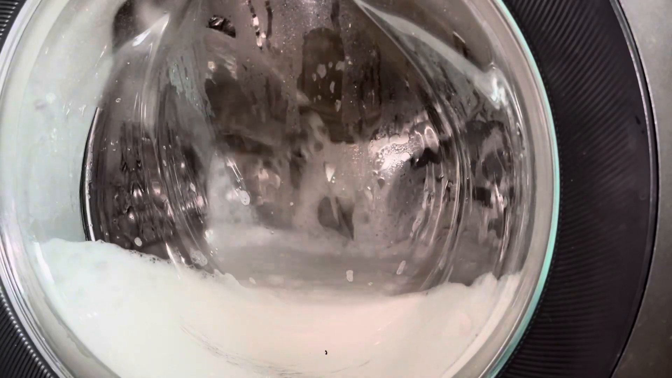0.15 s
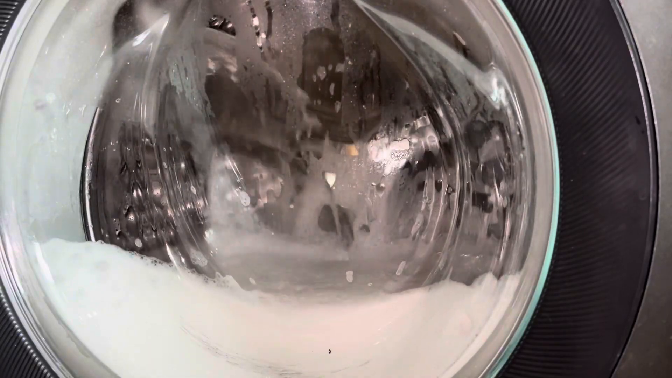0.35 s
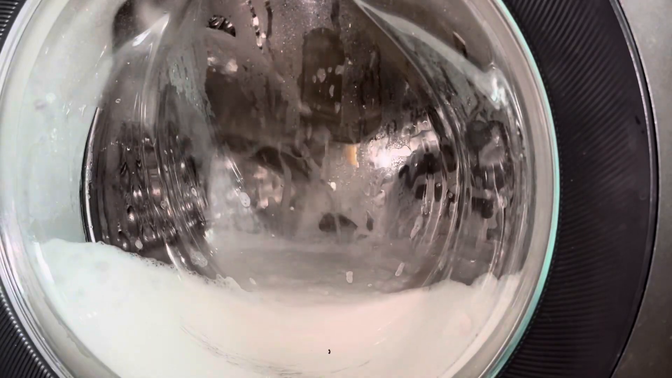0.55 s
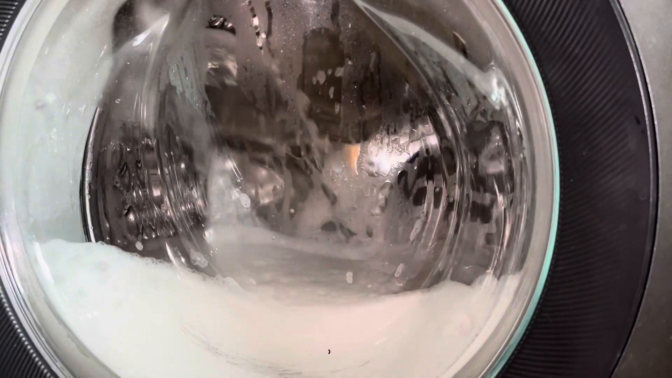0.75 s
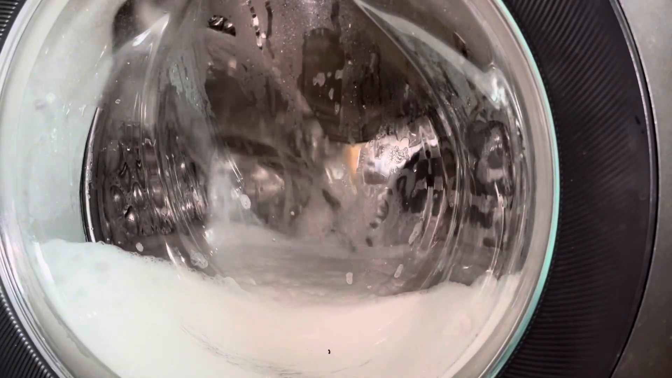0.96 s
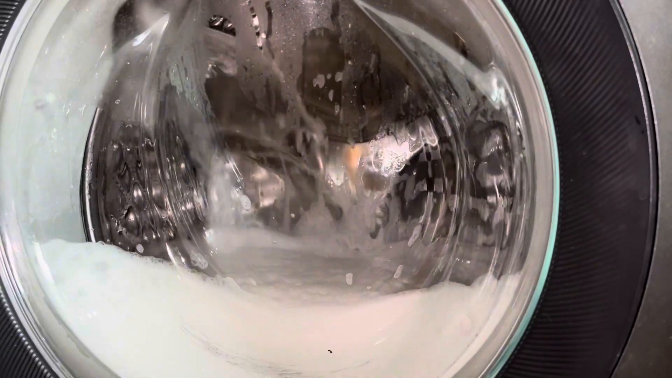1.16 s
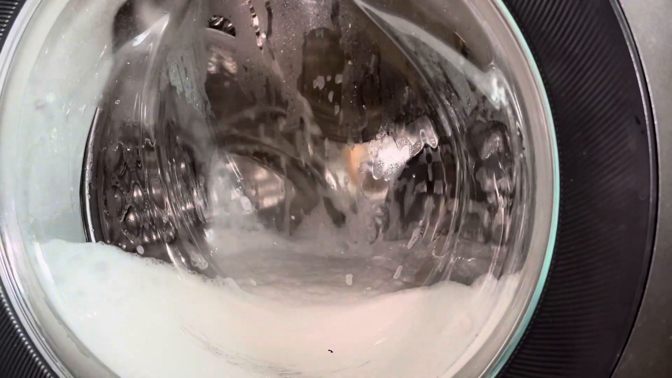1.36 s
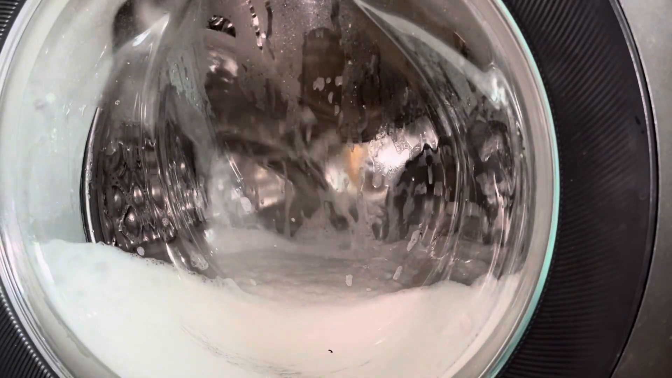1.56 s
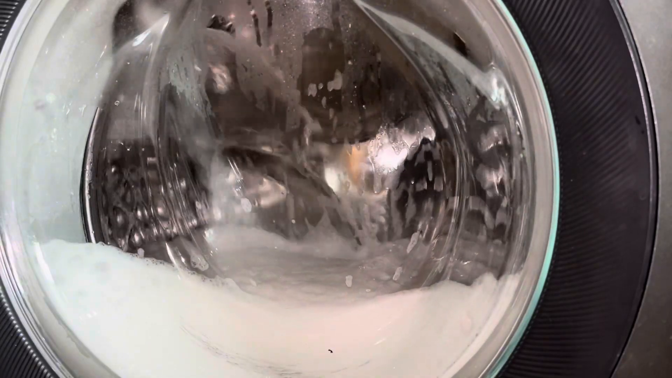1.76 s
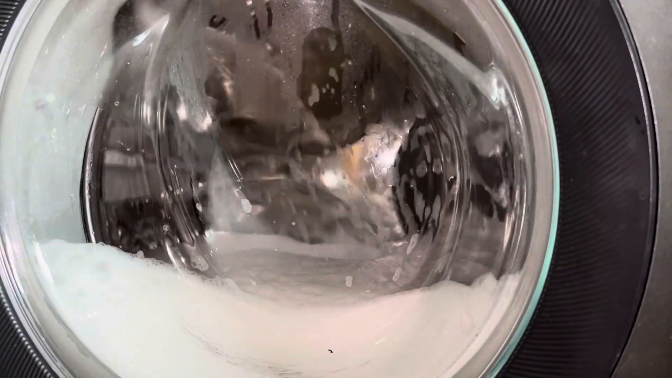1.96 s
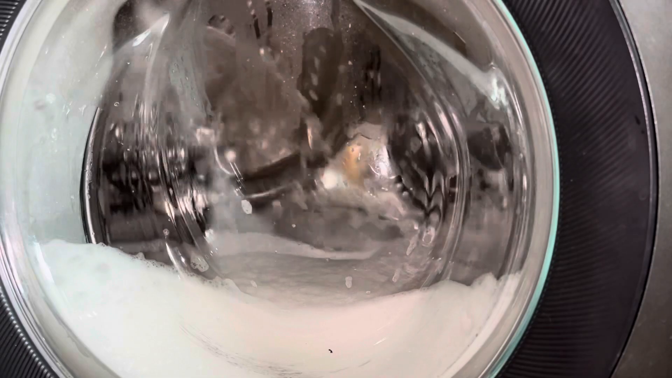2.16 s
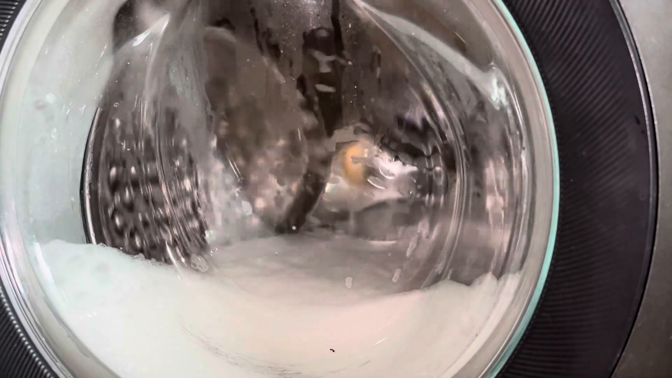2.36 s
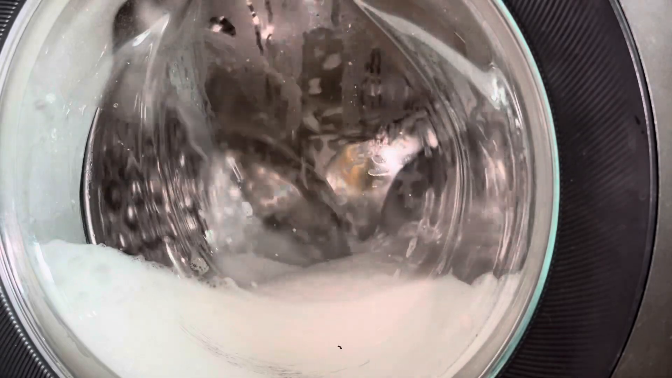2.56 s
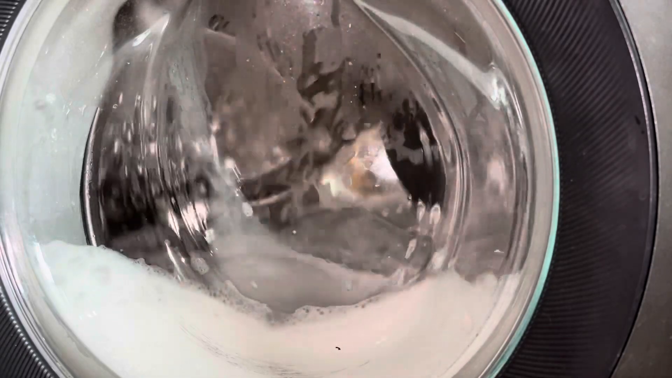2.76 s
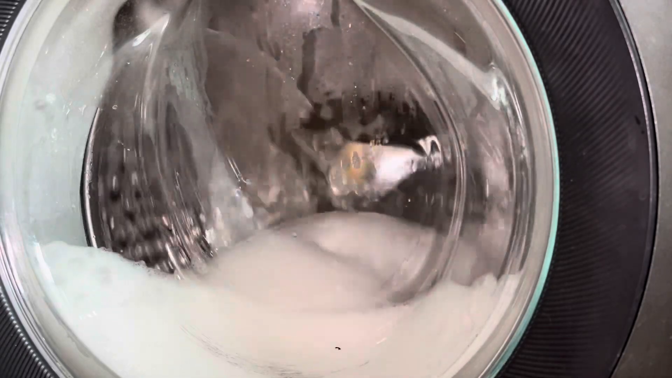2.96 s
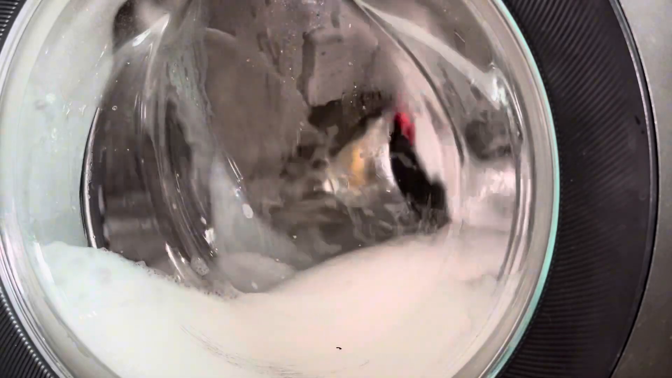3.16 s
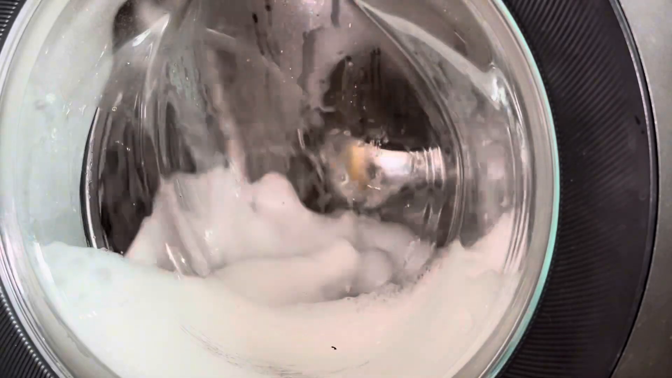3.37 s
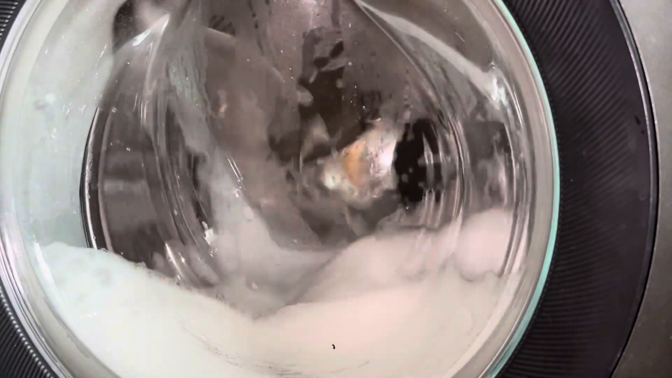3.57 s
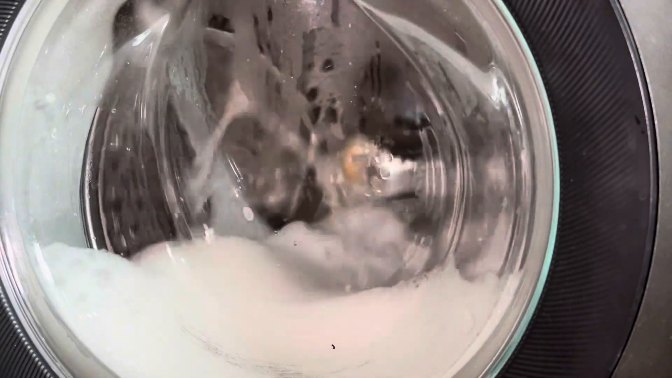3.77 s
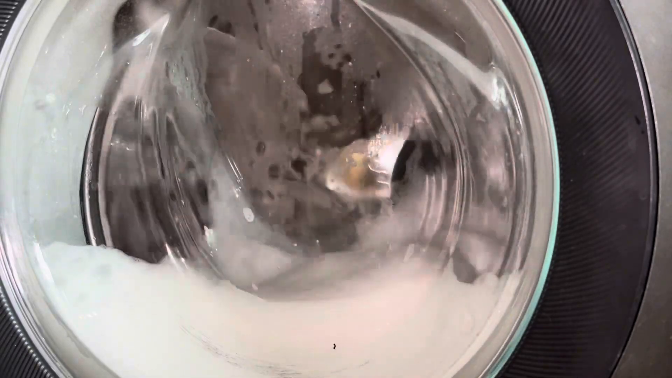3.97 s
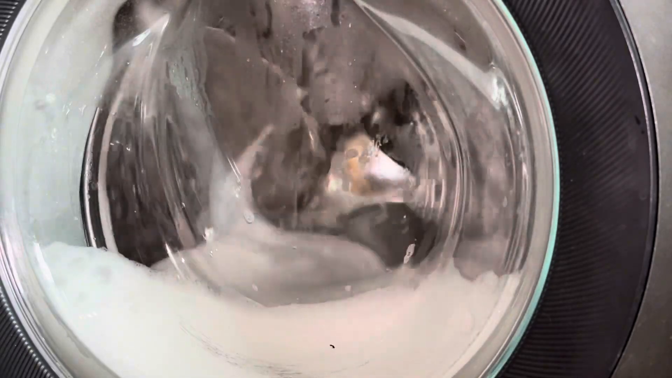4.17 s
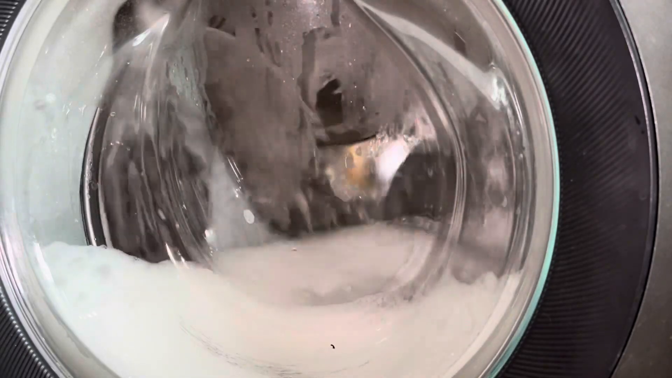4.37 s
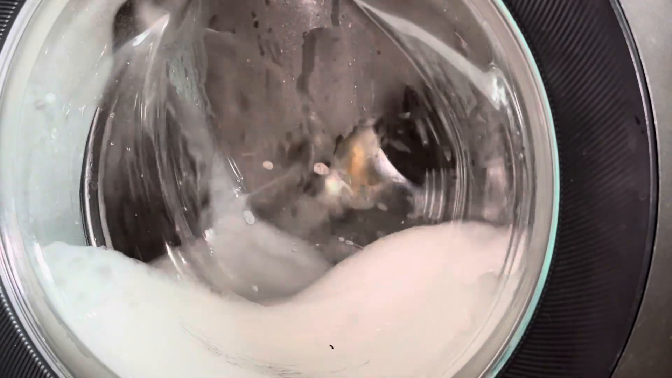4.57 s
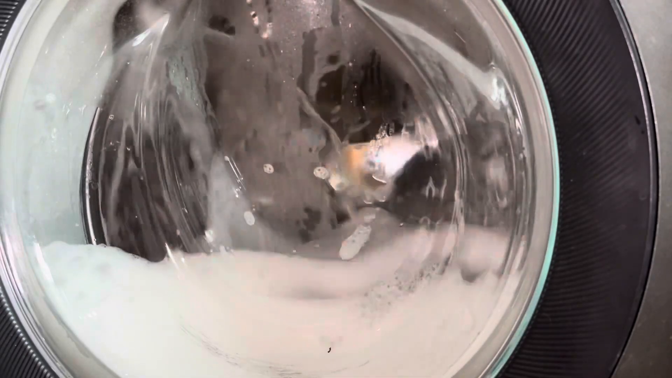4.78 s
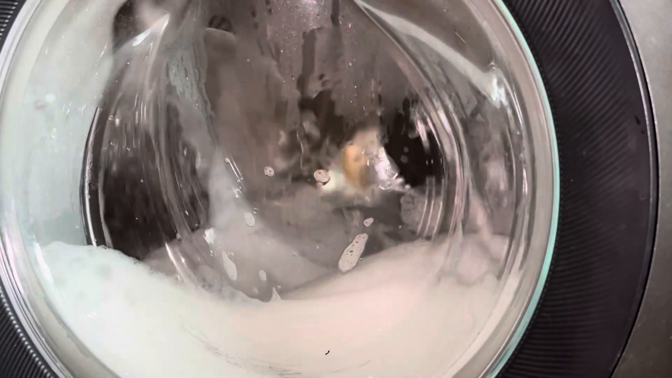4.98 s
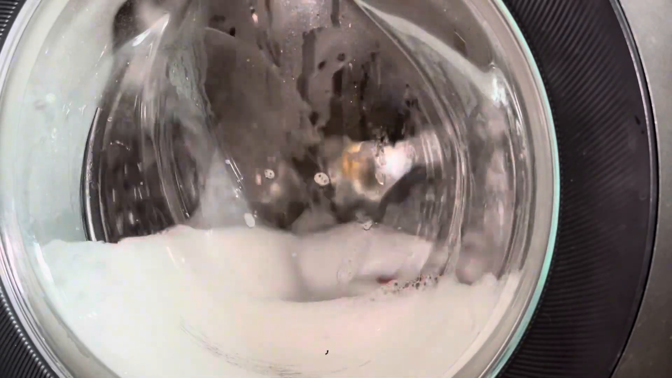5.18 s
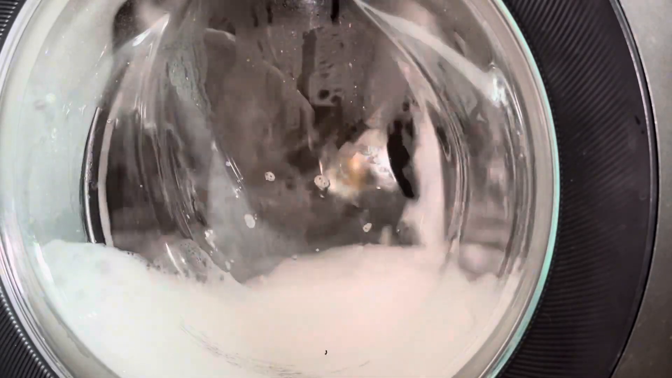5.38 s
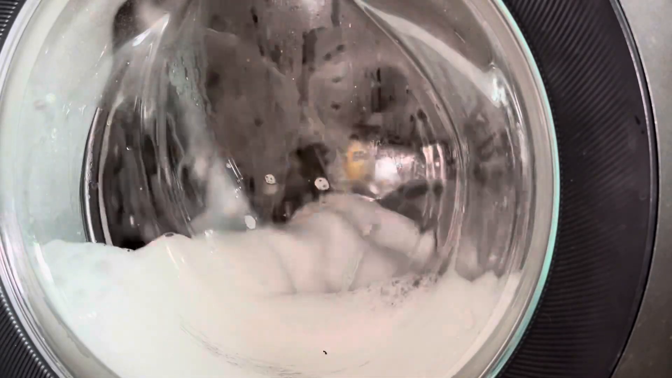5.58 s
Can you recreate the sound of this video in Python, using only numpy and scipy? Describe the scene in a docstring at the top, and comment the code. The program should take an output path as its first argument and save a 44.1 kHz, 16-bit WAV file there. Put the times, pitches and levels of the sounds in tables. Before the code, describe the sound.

Stereo close microphone, indoors, near the glass door. The pump hums under quiet trickling and a faint hiss while the drum rests. Then light ticks become clustered hard clacks and dull thuds of a solid object falling about the steel drum, the heaviest near five seconds, with suds swishing, rubbing and low panel thumps.

```python
"""A pump hums and water trickles behind washing-machine door glass; then the drum turns. A hard slab tumbles in
it: shaped noise bursts with a sharp first touch ring steel and glass modes. Slow sine swells boom the cabinet
and thud under the slab; coloured noise sloshes and rustles through the drum modes. Tones make the hum, noise
and ticks the water; below lie rumble, top hiss and a thin whistle."""
import sys
import numpy as np
from scipy import signal
from scipy.fft import rfft, irfft, next_fast_len
from scipy.io import wavfile
from scipy.ndimage import uniform_filter1d

SR = 44100
rng = np.random.default_rng(int(sys.argv[2]) if len(sys.argv) > 2 else 0)


def digitize_waveform(pressure):
    """Quantize a signal to 16-bit integers and store it at the path in sys.argv[1].

    Rows of a 2-D input are taken as channels; values are limited to [-1, 1].
    """
    field = np.atleast_2d(pressure).T
    bounded = np.clip(field, -1, 1)
    quanta = np.round(bounded * 32767).astype(np.int16)
    wavfile.write(sys.argv[1], SR, quanta)


N = 248283

# slab on drum: t/s, level/dB, contact centre f/Hz, struck spot's note f/Hz,
# then relative level/dB of thud, clank, note, crack, first touch; fade t60/s
SLAB_KNOCKS = [(2.015, -36, 337, 926, -5, -14, -10, -38, -9, 0.14),
               (2.134, -47.5, 430, 1450, -10, -15, -20, -48, -5, 0.25),
               (2.19, -43, 284, 810, -25, -6.5, -8, -39, -3, 0.16),
               (2.275, -37.5, 313, 830, 1, -9, -5.5, -36, -5, 0.14),
               (2.416, -36, 346, 1040, -5, -8, -14, -36, -1, 0.091),
               (2.467, -30, 338, 1490, -12, -9.5, -18, -35.5, -11, 0.13),
               (2.491, -40, 410, 810, -10, -11, -16, -36, 5, 0.076),
               (2.53, -25.5, 580, 750, -12, -9.5, -22, -44, 8.5, 0.133),
               (2.543, -24, 434, 890, -18, -11, -24, -39, 1, 0.11),
               (2.556, -39.5, 363, 825, -17, -5.5, -20, -35, 3, 0.11),
               (2.589, -31.5, 500, 800, -24, -14, -23, -45, 4, 0.087),
               (2.65, -32.5, 510, 1500, -18, -12, -16, -40, 6, 0.14),
               (2.701, -28, 365, 950, -15, -16, -26, -51, -7, 0.041),
               (2.713, -31, 326, 1020, -31, -10.5, -11, -40, -1.5, 0.14),
               (2.781, -54, 318, 1980, -10, 4.5, -5, -22, -5, 0.18),
               (2.947, -42.5, 267, 980, -8.5, -14.5, -8.5, -43, 2, 0.19),
               (2.982, -50.5, 400, 990, -14, -10, -17, -26, -4, 0.11),
               (3.089, -27, 430, 940, -6.5, -6, -5.5, -31.5, -6, 0.089),
               (3.158, -36, 273, 1940, -27, -6, -20, -32, -4, 0.13),
               (3.236, -25, 515, 930, -2.5, -9.5, -11, -32, 2, 0.14),
               (3.359, -18.5, 377, 1930, -16.5, -15.5, -41, -40, 2, 0.1),
               (3.376, -20, 331, 834, 2.5, -14.5, -12, -37.5, 2.5, 0.12),
               (3.396, -29, 300, 857, -11, -8.5, -10, -36, -2, 0.096),
               (3.427, -27, 242, 986, -14, -19.5, -21, -50, -2, 0.091),
               (3.496, -47, 383, 1040, -15.5, -22, -23, -57, 4, 0.23),
               (3.538, -37, 390, 2000, -10, -9.5, -18, -36.5, -6, 0.13),
               (3.608, -34.5, 308, 1960, 4, -9.5, -20, -32, -3.5, 0.07),
               (3.716, -22, 408, 710, -25, -17.5, -25.5, -43, 6.5, 0.17),
               (3.733, -24.5, 256, 820, -19, -39, -42, -47, -1.5, 0.026),
               (3.803, -16, 618, 1390, -6.5, -9, -11.5, -36, 2.5, 0.115),
               (3.852, -32, 470, 916, -5.5, -5.5, -19, -32.5, -5, 0.15),
               (3.897, -44, 400, 2450, -6, -7.5, -4, -23, -6.5, 0.072),
               (3.93, -24.5, 487, 1370, -4.5, -3.5, -19, -32, 3.5, 0.12),
               (4.004, -35, 860, 2360, -34, 0, -17, -25, -2, 0.12),
               (4.039, -39.5, 267, 1116, 7.5, 1, -3.5, -37, 7.5, 0.14),
               (4.07, -37.5, 310, 1040, -8, -23, -23, -46, 1, 0.23),
               (4.105, -41, 620, 850, -7, -15, -14, -45, 4, 0.09),
               (4.137, -48, 493, 2260, -7, -4.5, -12, -31, 1, 0.1),
               (4.213, -17.5, 663, 1496, -7.5, -10, -11.5, -34, -1, 0.1195),
               (4.258, -32, 555, 810, -18, -12, -18, -38, 8, 0.2),
               (4.334, -33, 558, 880, -9, -9.5, -8.5, -50, 12, 0.158),
               (4.408, -39.5, 448, 1000, -2, -9, -15, -35, -2, 0.15),
               (4.5298, -20, 440, 1300, -16.5, -3.5, -15, -23, 3.5, 0.048),
               (4.55, -40, 318, 1750, 2, -5, -13, -29, -3, 0.26),
               (4.706, -39.5, 440, 1880, -14, -0.5, -18, -23, 5, 0.15),
               (4.804, -17.5, 500, 1530, -14.5, -16, -21.5, -41, -7.5, 0.067),
               (4.815, -22, 503, 1590, -9, -27, -18, -40, 2, 0.097),
               (4.826, -29.5, 522, 802, -7, -20, -21, -45, -6, 0.1),
               (4.841, -18, 350, 800, 1, -22, -28, -53, -8, 0.094),
               (4.866, -39, 259, 750, 3, -17, -25, -51, 2, 0.062),
               (4.897, -36, 390, 960, -6, -20, -22, -45, -1, 0.097),
               (4.928, -30, 497, 775, -6, -20, -26, -40, -3, 0.1),
               (5.012, -44, 410, 970, -3, -14.5, -8, -40, -4, 0.31),
               (5.077, -28, 509, 975, -18, -4.5, -16, -40, 5.5, 0.083),
               (5.081, -9, 342, 1020, -9, -22.5, -35, -45, -1.5, 0.077),
               (5.093, -20.5, 256, 1400, -15.5, -20, -29, -43.5, -2.5, 0.13),
               (5.139, -35.5, 480, 950, -11, -22, -28, -33, 11, 0.13),
               (5.19, -36.5, 410, 905, -1, -23, -26, -34, -1, 0.088),
               (5.302, -50.5, 450, 1510, -12, -5, -10, -34, -2, 0.084),
               (5.333, -34.5, 294, 850, 8, -13, -14.5, -32, -0.5, 0.11),
               (5.45, -32.5, 331, 790, -6.5, -14.5, -24, -49, 12, 0.18),
               (5.5, -44, 460, 1990, -8, -2, -19, -40, -1, 0.15),
               (5.535, -23, 470, 1940, -19, -11, -25.5, -37, 8.5, 0.13),
               (5.562, -35, 460, 1480, 17, -9, -23, -32, 6, 0.13),
               (5.583, -28, 493, 740, -24, -12, -28, -41, 3, 0.13)]
# cabinet booms, with a few higher slab thuds near 125-130 Hz among them: t/s, level/dB, f/Hz
CABINET_BOOMS = [(2.063, -44, 73.5), (2.36, -49, 91), (2.561, -55, 130), (3.021, -34.5, 73.4),
                 (3.124, -59, 63.4), (3.263, -42, 73), (3.39, -38, 58.3), (3.439, -32.5, 73.4),
                 (3.633, -42, 69), (3.823, -31, 59.8), (3.853, -39, 56.7), (3.944, -30.5, 70.8),
                 (4.071, -39, 63.7), (4.22, -34, 69), (4.432, -39.5, 62.6), (4.539, -31, 125),
                 (4.69, -39.5, 75.7), (4.832, -39, 69), (4.864, -41, 54.3), (5.195, -50, 99),
                 (5.342, -33, 69), (5.408, -42, 75.6), (5.533, -36, 66.6)]
# drum and tub modes: f/Hz, width/Hz, relative level/dB
DRUM_MODES = [(172, 25, -2), (198, 20, -1), (248, 25, 2), (300, 20, 0), (345, 25, -4), (412, 22, -1),
              (467, 15, 4), (581, 25, -2), (664, 22, 2), (725, 25, -2), (824, 16, 3), (895, 16, 1),
              (965, 35, -1), (1035, 22, -2), (1180, 90, -3), (1300, 50, -1), (1372, 40, 1), (1484, 30, 0),
              (1550, 30, 3), (1840, 45, 0), (2060, 80, -6), (2395, 60, 4), (2980, 90, -1), (2420, 260, 1),
              (4400, 700, 1)]
# door glass modes: f/Hz, width/Hz, relative level/dB
GLASS_MODES = [(2284, 8, -13.5), (2830, 10, -12), (3730, 280, 8), (4220, 41, 2), (4650, 84, -4.5),
               (5230, 58, -16)]
# cabinet resonances in the rumble: f/Hz, width/Hz, relative level/dB
CABINET_MODES = [(69, 18, 9), (144, 1.9, -11.5), (293, 24, 10), (331, 3.1, -10.5), (498, 60, 3.5),
                 (637, 89, 3), (805, 26, 5.5), (937, 13, 7)]
# suds and load sliding round the drum, ahead of its modes: t/s, level/dB
SLOSH_LEVEL = [(1.9, -69), (2.22, -53), (2.6, -47), (2.85, -51), (3.7, -52.5), (3.92, -34), (4.08, -49),
               (5.43, -47), (5.63, -41)]
# slosh colour: f/Hz, relative level/dB
SLOSH_SPECTRUM = [(30, -1.5), (65, 12), (150, -9), (400, -0.5), (800, -9), (1600, -25.5), (3000, -44),
                  (8000, -64)]
# suds and slab rubbing on steel, ahead of its modes: t/s, level/dB
RUSTLE_LEVEL = [(1.95, -70), (2.53, -65), (2.62, -60.5), (2.93, -67), (3.33, -62), (3.63, -62.5),
                (3.77, -60.5), (3.91, -53), (4.02, -55.5), (4.22, -72), (4.34, -54), (4.43, -74.5),
                (4.58, -62), (4.76, -60.5), (5.43, -66.5), (5.63, -52)]
# rustle colour: f/Hz, relative level/dB
RUSTLE_SPECTRUM = [(400, -14.5), (800, 8.5), (1500, 1), (2450, -20.5), (2800, -23), (4500, -37.5),
                   (6000, -36), (8000, -57)]
# water on the glass, draining, then fed by the turning drum: t/s, level/dB
TRICKLE_LEVEL = [(0.0, -65.5), (0.25, -68), (0.72, -70.5), (1.8, -78), (2.27, -76.5), (2.7, -78),
                 (3.3, -79), (3.8, -73.5), (4.6, -70.5), (5.63, -65)]
# trickle colour: f/Hz, relative level/dB
TRICKLE_SPECTRUM = [(800, -14.5), (1500, -1.5), (2100, -0.5), (2900, -8.5), (3200, -3.5), (3600, -12),
                    (5000, -9), (6200, -12), (7400, -6.5), (7900, -37), (8800, -52)]
# clearest drops on the glass: t/s, level/dB
GLASS_DRIPS = [(0.0373, -62), (0.1261, -64), (0.158, -63), (0.178, -66), (0.4963, -64), (0.5272, -62),
               (0.6265, -61), (1.1333, -67)]
# pump tones and a faint high whine: f/Hz, level/dB, waver width/Hz
PUMP_TONES = [(100, -52, .3), (200, -57, .8), (301, -61.5, 8), (402, -69, 8), (500, -71, 10),
              (9980, -105, 12)]
# pump and water rumble colour: f/Hz, relative level/dB
RUMBLE_SPECTRUM = [(25, -33), (45, -9), (66, 0.5), (90, -12.5), (150, 6), (240, -4.5), (300, -6), (400, -2),
                   (520, -9), (820, -15.5), (1100, -16.5), (1800, -24.5), (3000, -49), (7000, -58),
                   (14000, -49)]
# faint top hiss: t/s, level/dB
FIZZ_LEVEL = [(0.0, -82), (1.5, -87.5), (3.21, -85), (4.06, -80.5), (4.94, -81.5), (5.63, -80)]
# top hiss colour: f/Hz, relative level/dB
FIZZ_SPECTRUM = [(8500, -37), (9600, 5), (10200, -4), (13500, -6), (14500, -11)]
# one thin whistle: t/s, length/s, level/dB, f/Hz
THIN_WHISTLE = (2.912, .065, -82, 6400)
# port pair likeness: f/Hz, share of common sound (0-1)
PORT_LIKENESS = [(60, 1), (130, 0.8), (290, 0.76), (630, 0.28), (1300, 0.39), (2300, .75), (4300, 1),
                 (6000, 0.2), (7800, 0.9), (10500, 0.8), (14000, 0.8)]
# port pair, left lead: f/Hz, phase/rad
PORT_LEAD = [(60, 0.49), (950, -0.32), (1550, -1.46), (1810, 0.98), (3790, 1), (4740, 1.62), (7670, -3.5),
             (9470, -2.5), (10400, -6.5), (13600, -6)]
# port pair, left over right: f/Hz, balance/dB
PORT_BALANCE = [(60, 0.5), (500, 0.5), (1200, -0.5), (2500, 4), (5000, 8.5), (8000, -0.5)]

# hardness = (usual / fade) ** power: short knocks are harder and rise faster
USUAL_T60_S, HARD_POWER, USUAL_RISE_S = 0.1297, 0.62, 0.003108
TOUCH_WEIGHT = 0.56
NOTE_BAND_RATIO = 1.08
SPRAY_RE_CRACK_DB, TOP_NOISE_RE_CRACK_DB = -1, -21
DROPLET_SPREAD_DB, SPOT_SPREAD_DB = 2.5, 2.5
BOOM_SCALE_CYCLES = 3.3
RUBS_PER_S, RUB_SPREAD_DB = 2600, 2.5
TICKS_RE_TRICKLE_DB, HISS_RE_TRICKLE_DB = -15, -2.0
RUMBLE_LEVEL_DB = -51
BASS_EDGE_HZ, TOP_EDGE_HZ = 45, 14350


def slab():
    """All knocks ring the same drum and door glass; each spot wakes the drum modes by other amounts."""
    count, size = len(SLAB_KNOCKS), 16384
    out = np.zeros((2, N))
    rattles = rng.standard_normal((count, 2, 10000))
    droplets = evened(uniform_filter1d(rng.standard_normal((count, 1, 10000)), size=70))
    spatters = rattles * gain_of(DROPLET_SPREAD_DB * droplets)
    click = 1. * (np.arange(size) == 0)
    modes = rfft([gain_of(3.0 + db) * ring(click, hz, width) for hz, width, db in DRUM_MODES])
    spots = gain_of(SPOT_SPREAD_DB * rng.standard_normal((count, len(DRUM_MODES))) - 2.5)
    for (s, *row), rattle, spatter, spot in zip(SLAB_KNOCKS, rattles, spatters, spots):
        blow = rfft(knock(*row, rattle, spatter), size)
        add(out, s, irfft(blow * (1 + spot @ modes), size))
    glass = sum(gain_of(db - 11.0) * ring(out, hz, width) for hz, width, db in GLASS_MODES)
    return ports(out + glass)


def knock(db, hz, note_hz, thud_db, clank_db, note_db, crack_db, touch_db, t60_s, rattle, spatter):
    """A hard touch and its rattle: the crack rises and dies fast, the dull body lingers."""
    t = np.arange(rattle.shape[1]) / SR
    t60_s = max(t60_s, .02)
    hard = (USUAL_T60_S / t60_s) ** HARD_POWER
    rise_s = USUAL_RISE_S / hard
    # relative level/dB, low edge/Hz, high edge/Hz, rise factor, fade factor, touch weight, source
    parts = [
        (thud_db, 135, 240, 3., .9, .3, rattle),
        (0, 0.63 * hz, 1.68 * hz, 1.2, 1.05, .47, rattle),  # body
        (clank_db - 5.0, 750, 2300, .7, 1.1, .45, spatter),
        (note_db, note_hz / NOTE_BAND_RATIO, note_hz * NOTE_BAND_RATIO, .45, .55, .9, rattle),
        (crack_db, 3200, 5200, .6, .5, 0.57 * hard ** 1.3, rattle),
        (crack_db + SPRAY_RE_CRACK_DB, 1900, 5400, 2.5, 1.6, .01, spatter),
        # faint top-band noise following the crack
        (crack_db + TOP_NOISE_RE_CRACK_DB, 9700, 12800, 1.5, 1.2, .05, rattle)]
    out = 0
    for part_db, lo_hz, hi_hz, soft, lasting, touch, source in parts:
        onset = 1 - np.exp(-t / (soft * rise_s))
        fade = gain_of(-60 * t / (lasting * t60_s))
        tail = gain_of(-19.0 - 60 * t / (5.7 * t60_s))
        shape = onset * (fade + tail)
        shaking = muffled(source * shape, lo_hz, hi_hz)
        # energy follows the shape, whatever the bandwidth
        energy_match = np.linalg.norm(shape) / np.linalg.norm(shaking, axis=1, keepdims=True)
        sound = 0.4 / hard * shaking * energy_match
        impulse = 1. * (np.arange(3000) == round(soft * rise_s * SR))
        blow = muffled(impulse, lo_hz, hi_hz)
        add(sound, 0, gain_of(touch_db) * TOUCH_WEIGHT * hard * touch * blow / abs(blow).max())
        out = out + gain_of(part_db) * sound
    return gain_of(db) * out


def muffled(x, lo_hz, hi_hz):
    """One band of a sound; foam and glass dull its upper edge."""
    band = signal.lfilter(*signal.butter(2, [lo_hz, hi_hz], "bandpass", fs=SR), x)
    return signal.lfilter(*signal.butter(2, 0.83 * hi_hz, fs=SR), band)


def drum(x, ring_db):
    """Steel adds its modal resonances to whatever moves on it."""
    return x + sum(gain_of(ring_db + db) * ring(x, hz, width) for hz, width, db in DRUM_MODES)


def cabinet():
    """Side panels boom, and the slab thuds low now and then: a few soft sine cycles, swelling and fading."""
    out = np.zeros(N)
    for (s, db, hz), phase in zip(CABINET_BOOMS, rng.random(len(CABINET_BOOMS))):
        scale_s = BOOM_SCALE_CYCLES / hz
        u = np.arange(0, 3 * scale_s, 1 / SR) / scale_s
        swell = 3.0 * u * np.exp(1 - 3.2 * u)
        add(out, s, gain_of(db) * swell * np.sin(2 * np.pi * (BOOM_SCALE_CYCLES * u + phase)))
    return out


def slosh():
    """Suds and sliding load: patchy low noise under a level curve."""
    return along(SLOSH_LEVEL) * noise(SLOSH_SPECTRUM, 6.9, size=1024)


def rustle():
    """Wet rubbing: noise modulated by dense uneven rubs in clumps."""
    clumps = gain_of(2.0 * evened(uniform_filter1d(rng.standard_normal(N), size=500)))
    strengths = gain_of(RUB_SPREAD_DB * np.minimum(rng.exponential(1, N), 4))
    rubs = strengths * (rng.random(N) < RUBS_PER_S / SR)
    grain = clumps * np.sqrt(abs(uniform_filter1d(rubs ** 2, size=60)))
    wet = noise(RUSTLE_SPECTRUM, 2.5, size=512) * (0.51 + evened(grain))
    return along(RUSTLE_LEVEL) * evened(wet)


def trickle():
    """Running water: hiss ringing the glass, and clustered drops as resonant ticks."""
    clusters = np.maximum(evened(uniform_filter1d(rng.standard_normal(N), size=900)), 0)
    sizes = gain_of(3.5 * np.minimum(rng.exponential(1, (2, N)), 3))
    drops = sizes * (rng.random(N) < 420 * clusters / SR)
    low_ticks = ring(ring(drops, 3550, 520), 3300, 450)
    high_ticks = ring(ring(drops[::-1], 4800, 390), 5800, 280)  # channels swapped
    ticks = evened(low_ticks + 0.35 * high_ticks)
    hiss = noise(TRICKLE_SPECTRUM, 2.0, size=512)
    hiss = evened(hiss + sum(gain_of(db) * ring(hiss, hz, width) for hz, width, db in GLASS_MODES))
    water = gain_of(HISS_RE_TRICKLE_DB) * hiss + gain_of(TICKS_RE_TRICKLE_DB) * ticks
    return along(TRICKLE_LEVEL) * water


def drips():
    """Larger single drops: short decaying sine ticks."""
    out, t = np.zeros(N), np.arange(600) / SR
    tick = np.minimum(t / 0.002, 1) * np.sin(2 * np.pi * 3600 * t)
    for s, db in GLASS_DRIPS:
        add(out, s, gain_of(db - 60 * t / 0.044) * tick)
    return out


def pump():
    """Tones near multiples of twice the mains frequency, plus a whine; wider ones waver more."""
    t, out = np.arange(N) / SR, np.zeros(N)
    for hz, db, width in PUMP_TONES:
        pole = np.exp(-np.pi * width / SR)
        re, im = signal.lfilter([1], [1, -pole], rng.standard_normal((2, N)))
        waver = 1 + 0.061 * np.sqrt(width) * (evened(re) + 1j * evened(im))
        carrier = np.exp(2j * np.pi * (hz * t + rng.random()))
        out += gain_of(db) * evened((waver * carrier).real)
    return out


def rumble():
    """Broad pump and water noise, with the cabinet's resonances added."""
    x = noise(RUMBLE_SPECTRUM, 0.96, size=2048)
    resonant = sum(gain_of(db) * ring(x, hz, width) for hz, width, db in CABINET_MODES)
    return gain_of(RUMBLE_LEVEL_DB) * evened(x + resonant)


def fizz():
    """Faint top hiss: high coloured noise under a level curve."""
    return along(FIZZ_LEVEL) * noise(FIZZ_SPECTRUM, 1.5, size=256)


def whistle():
    """Narrow resonated noise that starts quickly and fades."""
    s, length_s, db, hz = THIN_WHISTLE
    out, u = np.zeros((2, N)), np.arange(0, 1, 1 / (length_s * SR))
    tone = evened(ring(ring(rng.standard_normal((2, len(u))), hz, 220), hz, 220))
    add(out, s, gain_of(db) * np.minimum(u / .08, 1) * (1 - u) * tone)
    return out


def ports(pair):
    """Right port hears part of the left sound and part of an unrelated twin, shifted in phase."""
    size = next_fast_len(N)
    hz, (a, b) = np.fft.rfftfreq(size, 1 / SR), rfft(pair, size)
    same = np.clip(read(PORT_LIKENESS, hz), 0, 1)
    tilt = gain_of(read(PORT_BALANCE, hz) / 2)
    right = (same * a + np.sqrt(1 - same ** 2) * b) * np.exp(-1j * read(PORT_LEAD, hz))
    return irfft(np.array([a * tilt, right / tilt]), size)[:, :N]


def noise(colour, patchy_db, size):
    """Two unrelated noises of one colour that share drifting time-frequency patches."""
    hop, hz = size // 4, np.fft.rfftfreq(size, 1 / SR)
    a, b, c, d, patches = rng.standard_normal((N // hop + 5, len(hz), 5)).T
    patches = uniform_filter1d(uniform_filter1d(patches, size=9, axis=0), size=9, axis=1)
    level_db = read(colour, hz)[:, None] + patchy_db * evened(patches)
    z = np.array([a + 1j * b, c + 1j * d]) * gain_of(level_db)
    return evened(signal.istft(z, nperseg=size, noverlap=size - hop)[1][:, :N])


def ring(x, hz, width_hz):
    """A fixed two-pole resonance of peak gain 1."""
    return signal.lfilter(*signal.iirpeak(hz, hz / max(width_hz, .1), SR), x)


def gain_of(db):
    """Amplitude ratio of a level in dB."""
    return 10 ** (np.asarray(db) / 20)


def evened(x):
    """Scale to unit rms."""
    return x / np.sqrt(np.mean(x ** 2) + 1e-20)


def read(points, hz):
    """Interpolate a curve over log frequency."""
    f, value = np.transpose(points)
    return np.interp(np.log(hz + 1), np.log(f + 1), value)


def along(rows):
    """Gain over time from a level curve, near silent before a first point later than zero."""
    s, db = np.transpose(rows)
    return gain_of(np.interp(np.arange(N) / SR, s, db, left=-120))


def add(mix, s, sound):
    """Add a sound in place at s seconds, cut at the end."""
    part = mix[..., round(s * SR):][..., :sound.shape[-1]]
    part += sound[..., :part.shape[-1]]


def scene():
    """Slab, drum wash and water through the ports; pump and booms nearly central."""
    drum_wash = gain_of(-3.5) * drum(slosh() + rustle(), 0.55)
    steady = drum_wash + trickle() + drips() + rumble() + fizz() + whistle()
    central = (pump() + cabinet()) * gain_of([[.3], [-.3]])
    return slab() + ports(steady) + central


def record(dry):
    """Drop the deepest bass, then limit the top of the band."""
    bass_cut = signal.butter(3, BASS_EDGE_HZ, "highpass", fs=SR, output="sos")
    thinned = signal.sosfilt(bass_cut, dry)
    top_cut = signal.firwin(511, TOP_EDGE_HZ, window=("kaiser", 9), fs=SR)
    return signal.oaconvolve(thinned, top_cut[None], "same")


dry = scene()
out = record(dry)
digitize_waveform(out)
```